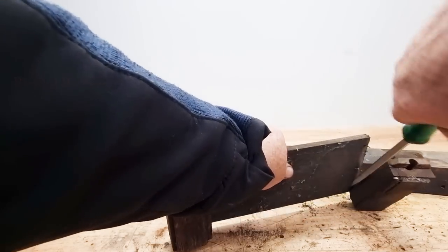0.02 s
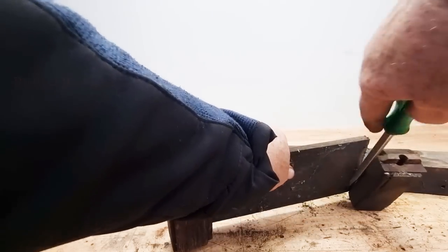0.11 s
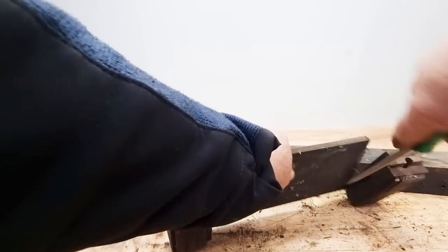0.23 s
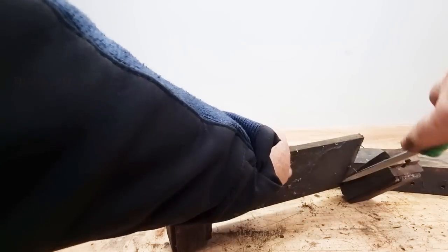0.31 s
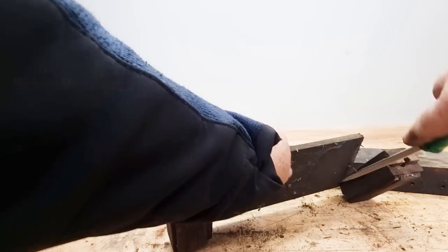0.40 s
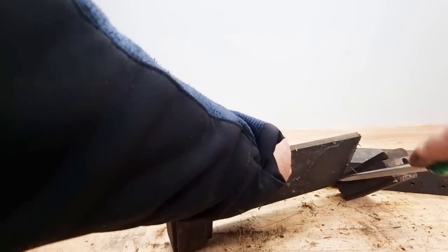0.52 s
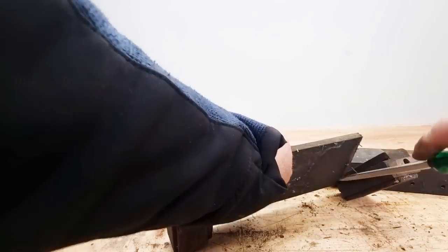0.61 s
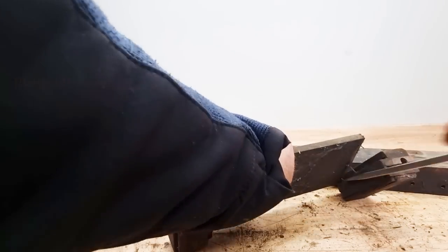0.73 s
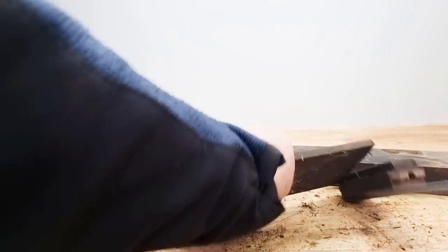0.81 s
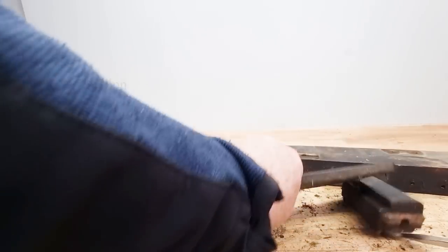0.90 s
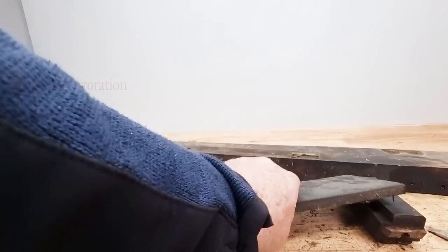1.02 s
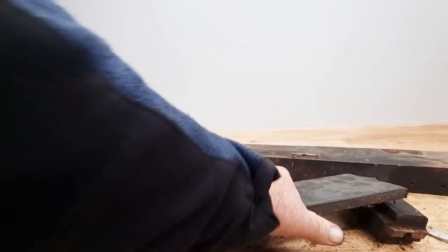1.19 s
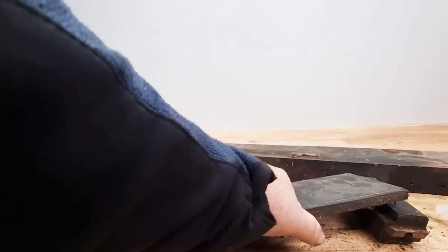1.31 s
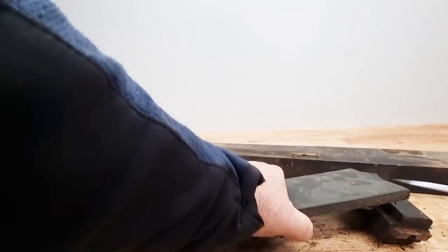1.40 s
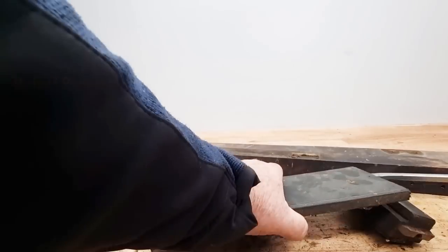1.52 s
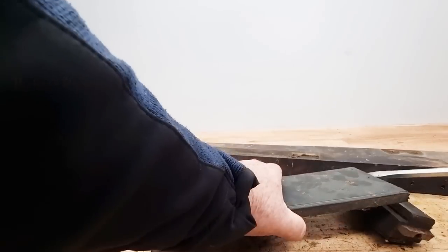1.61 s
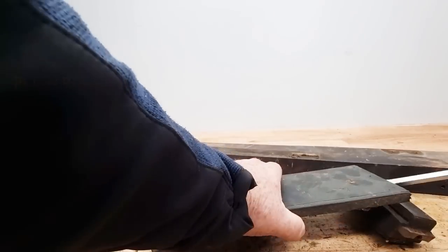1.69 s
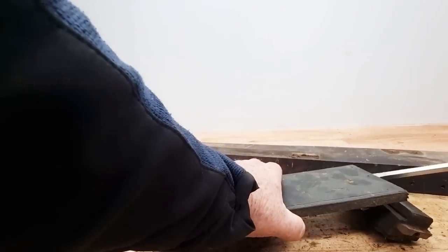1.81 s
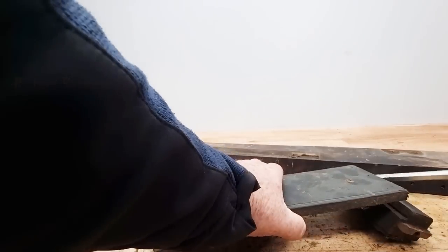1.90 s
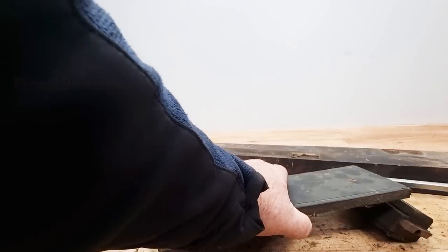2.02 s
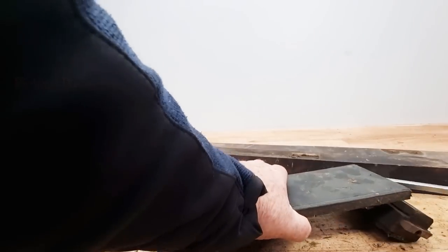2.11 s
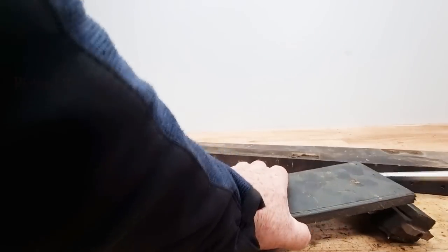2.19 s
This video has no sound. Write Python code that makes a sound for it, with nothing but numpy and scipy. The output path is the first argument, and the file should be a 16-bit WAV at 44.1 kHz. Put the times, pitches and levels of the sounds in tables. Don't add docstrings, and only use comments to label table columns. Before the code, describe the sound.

Close stereo pickup of old timber being prised on a wooden bench: faint drag, dry crack, dull thumps, a thin metal ping, a busy burst of wooden knocks, then light ticks over faint room hum.

```python
import sys
import numpy as np
from scipy import signal
from scipy.fft import rfft, irfft, next_fast_len
from scipy.io import wavfile
from scipy.ndimage import uniform_filter1d, map_coordinates

SR = 44100
rng = np.random.default_rng(int(sys.argv[2]) if len(sys.argv) > 2 else 0)


def gain_from_db(level_db):
    decades = np.asarray(level_db, float) / 20
    return 10 ** decades


def store_wav(level_fs):
    pcm = np.round(np.clip(np.atleast_2d(level_fs), -1, 1) * 32767)
    wavfile.write(sys.argv[1], SR, pcm.T.astype(np.int16))


N = 97020

# pitch_hz, level_db (per Hz)
ROOM_TONE = [(15, -45), (25, -22), (81, -6), (215, -9), (500, -13), (1330, -14), (2700, -25), (3600, -40),
             (6000, -61)]
ROOM_TONE_DB = -60
# pitch_hz, width_hz, level_db
HUMS = [(155.8, 5.5, -72.5), (482, 70, -67.5)]
# pitch_hz, level_db (per Hz)
HISS_COLOUR = [(4000, 2.5), (11000, -6.5)]
HISS_DB, HISS_TOP_HZ = -84.5, 11950
MOTOR_HZ, MOTOR_WANDER_HZ = 95, 3.96
MOTOR_DB, MOTOR_SWELL_DB, MOTOR_FADE_DB = -60, 3.2, -8.5

# pitch_hz, t60_s (time to die by 60 dB)
ROOM_DECAY = [(150, 0.41), (1000, 0.26), (4000, 0.28), (14000, 0.26)]
ROOM_DB, ROOM_GAP_S = -1, .007
# pitch_hz, likeness_0_to_1
LIKENESS = [(100, .99), (300, .93), (600, .85), (1400, .7), (3100, .6), (6800, .3), (15000, .2)]

# start_s, length_s, level_db
DRAG_STROKES = [
    (0.0, 0.13, -65.5),
    (0.223, 0.071, -51.5),
    (0.51, .11, -58),
    (0.13, .09, -66),
    (0.7, 0.17, -60),
    (0.9, .17, -56),
    (1.2, 0.11, -60),
    (1.446, .045, -57.5),
    (1.751, 0.094, -75),
]
# pitch_hz, level_db (per Hz)
DRAG_COLOUR = [(200, -17), (450, 5.5), (1000, 1), (2400, -6.5), (3500, -14.5), (8000, -42.5)]
GRAINS_PER_S, GRAIN_SPREAD_DB = 2000, 3

# start_s, peak_db, pitch_hz, swell_s, ring_share (if a hand damps it)
PUSHES = [(0.698, -44, 390, 0.003, .4), (0.241, -39, 250, 0.0032), (0.259, -42, 330, 0.0017),
          (0.276, -39, 197, 0.0061), (0.29, -46, 420, 0.011, .7), (0.472, -42, 249, 0.003),
          (0.514, -35.5, 233, 0.0065), (0.540, -34, 227, 0.0017, .7), (0.562, -45, 330, 0.002, .5),
          (0.661, -42, 210, 0.0034), (0.69, -32.5, 232, 0.0077), (0.779, -46, 330, 0.004, .6),
          (0.826, -36, 233, 0.0052), (0.841, -32.5, 245, 0.0079), (0.864, -35, 249, 0.008),
          (0.904, -39.5, 382, 0.0024), (0.913, -31, 240, 0.0067), (0.947, -29, 255, 0.012),
          (0.969, -37.5, 384, 0.0026), (0.982, -30, 211, 0.0069), (1.001, -46, 413, 0.0022),
          (1.131, -37, 281.5, 0.0016), (1.143, -45, 306, 0.0012), (1.152, -45, 420, 0.004),
          (1.206, -38.5, 260, 0.0065), (1.356, -56, 285, 0.0027), (1.663, -50, 256, 0.0038),
          (1.717, -50, 237, 0.0046), (1.761, -48, 203, 0.0044), (2.079, -43.5, 233, 0.014),
          (0.485, -41, 250, .003, .7), (0.519, -48, 450, .002, .3), (0.549, -44, 380, .002, .5),
          (0.803, -44, 400, .003, .5), (0.813, -46, 300, .003, .5), (0.17, -54, 200, .01),
          (0.745, -50, 200, .005), (1.449, -57, 500, .003, .4), (1.5, -56, 190, .01)]
# pitch_hz, level_db, t60_s
BENCH_MODES = [(191.5, 0, 0.085), (243, 4.5, 0.057), (357, 2.5, 0.09), (420, 0.5, 0.15), (507, -6, 0.1)]
# start_s, peak_db, pitch_hz
BLOCK_HITS = [(0.698, -38, 950), (0.5375, -38, 800), (0.8995, -25, 1350), (0.911, -33, 1450),
              (0.9405, -24, 1400), (0.967, -32, 1330), (0.972, -30, 850), (0.990, -31, 1400),
              (1.016, -38, 1220), (1.1275, -31, 1040), (1.1285, -38, 520), (1.1955, -28, 1330),
              (1.2115, -32, 1350), (1.449, -49, 1500), (1.462, -49, 1400), (0.905, -36, 1300),
              (0.914, -36, 1500), (0.927, -38, 1300), (0.947, -40, 1500), (0.954, -38, 1350),
              (0.978, -35, 1200), (1.003, -40, 1000), (1.137, -45, 950), (1.145, -45, 1100),
              (1.202, -42, 1500), (1.207, -43, 1100), (1.220, -41, 950), (1.240, -48, 1250),
              (0.699, -43, 1600), (0.518, -54, 600), (0.542, -46, 1400)]
# pitch_hz, level_db, t60_s
BLOCK_MODES = [(580, 8, 0.025), (820, -1, 0.02), (1060, 4, 0.017), (1230, 5, 0.018), (1400, 1, 0.016),
               (1560, -1, 0.016), (1750, 7, 0.017), (2330, -8, 0.025)]
BASS_CUT_HZ = 70

# start_s, length_s, level_db, low_edge_hz, top_edge_hz (if duller)
SCRAPE_STROKES = [
    (0.47, 0.064, -68, 1800),
    (0.71, 0.11, -82, 1000),
    (0.823, 0.043, -64, 3300, 10000),
    (0.9, 0.098, -75.5, 1970),
    (1.031, 0.18, -82.5, 2000),
    (1.234, 0.076, -85.5, 2000),
    (1.318, 0.058, -78.5, 2500),
    (1.448, 0.03, -67, 1700, 4000),
    (1.652, 0.025, -78, 2200, 4000),
]
# pitch_hz, width_hz, level_db (over the plain rasp)
TIP_MODES = [(2500, 350, 10), (3850, 400, 11), (4450, 300, 6), (6400, 400, 7), (7200, 500, 11)]
STROKE_EDGE_S, TIP_TOP_HZ = 0.0066, 12000

# start_s, peak_db, pitch_hz
SHAFT_TICKS = [
    (0.698, -34, 2400),
    (0.703, -35, 2100),
    (0.707, -42, 2100),
    (1.738, -43, 2300),
    (1.7405, -41, 2400),
    (1.741, -49, 4200),
    (1.760, -51, 2200),
]
# pitch_hz, level_db, t60_s
SHAFT_MODES = [(2080, -3, .025), (2330, 0, .035), (2700, -2, .02), (3400, -8, .02), (3800, -4, .025),
               (4350, -3, .025), (4800, -7, .02), (6700, -6, .025)]
# start_s, peak_db, pitch_hz
PINGS = [
    (0.5385, -43.5, 2840),
    (0.556, -58, 2300),
]
# pitch_hz, level_db, t60_s
FREE_SHAFT_MODES = [(2590, 0, .04), (3750, -4, .03), (5300, -1, .028)]
# start_s, peak_db, pitch_hz
LIGHT_TOUCH = [
    (1.704, -60, 4330),
]

# start_s,
# level_db, t60_s, low_edge_hz, top_edge_hz
CRACK_BURSTS = [(0.0604, -47.5, 0.07, 7000, 13000), (0.2315, -41, 0.19, 1110, 22000),
                (0.234, -46, .05, 1500, 9000), (0.698, -47, 0.03, 1180, 4800),
                (0.692, -62, .03, 2000, 4500), (0.901, -44, 0.079, 1720, 4200),
                (0.939, -47, 0.09, 1740, 3700), (0.9724, -59.5, 0.051, 2000, 14000),
                (0.99, -50, 0.039, 1770, 3200), (1.126, -55, 0.046, 1530, 4860),
                (1.21, -62, 0.12, 2000, 4240), (1.265, -63, 0.06, 2400, 7800),
                (1.738, -57, 0.029, 2500, 12000)]
CRACK_TILT_DB, CRACK_RISE_S = -5, 0.00085

# pitch_hz, lift_db
RIGHT_TREBLE = [(300, .3), (1500, .3), (2800, 3.7), (5000, 7.5), (12000, 7)]
# pitch_hz, phase_radians
LEFT_PHASE = [(150, .05), (500, .1), (1200, .25), (2000, .2), (4300, .8), (9000, .9), (14000, 1.7)]
TOP_HZ = 16450


def unit(x):
    return x / np.sqrt(np.mean(x ** 2) + 1e-20)


def along(points, hz):
    f, value = np.transpose(points)
    return np.interp(np.log(hz + 1), np.log(f + 1), value)


def filtered(x, response):
    n = x.shape[-1]
    size = next_fast_len(n + 8192)
    spectrum = rfft(x, size) * response(np.fft.rfftfreq(size, 1 / SR))
    return irfft(spectrum, size)[..., :n]


def high(low_hz):
    return lambda hz: (1j * hz / (low_hz + 1j * hz)) ** 2


def add(track, s, sound):
    part = track[..., round(s * SR):][..., :sound.shape[-1]]
    part += sound[..., :part.shape[-1]]


def pair(count):
    def mid_and_side(hz):
        turn = np.arccos(np.clip(along(LIKENESS, hz), -1, 1)) / 2
        return np.array([np.cos(turn), np.sin(turn)])

    mid, side = filtered(rng.standard_normal((2, count)), mid_and_side)
    return np.array([mid + side, mid - side])


def room(x, wet_db=0):
    x = x * np.ones((2, 1))
    hz, t, z = signal.stft(pair(SR // 3), SR, nperseg=256)
    fade = gain_from_db(-60 * t / along(ROOM_DECAY, hz)[:, None])
    tail = signal.istft(z * fade, SR, nperseg=256)[1]
    late = np.pad(x, ((0, 0), (round(ROOM_GAP_S * SR), 0)))
    wet = signal.fftconvolve(late, tail / np.linalg.norm(tail[0]), axes=1)
    direct = np.pad(x, ((0, 0), (0, wet.shape[1] - x.shape[1])))
    return gain_from_db(ROOM_DB + wet_db) * wet + direct


def struck(events, modes, reach_oct, gain_db, wet_db, swell_s=.001, scatter=0.026):
    out, t = np.zeros((2, N)), np.arange(SR // 5) / SR
    hz, level_db, t60 = np.transpose(modes)[..., None]
    for s, db, pitch_hz, *soft in events:
        rise_s = soft[0] if soft else swell_s
        ring_share = soft[1] if soft[1:] else 1
        luck = rng.standard_normal((len(modes), 3))
        nearness = np.exp(-(np.log2(hz / pitch_hz) / reach_oct) ** 2 / 2)
        share = gain_from_db(level_db + luck[:, :1]) * nearness
        mode_hz = hz * (1 + scatter * luck[:, 1:2])
        waves = np.sin(2 * np.pi * mode_hz * t + .2 * luck[:, 2:])
        ring = np.sum(share * gain_from_db(-60 * t / (t60 * ring_share)) * waves, axis=0)
        ring = ring * (1 - np.exp(-(t / rise_s) ** 2))
        add(out, s, room(gain_from_db(db + gain_db) * ring / np.linalg.norm(share), wet_db))
    return out


def grit(count):
    luck = rng.random((2, count))
    size = gain_from_db(-GRAIN_SPREAD_DB * np.log(luck[1] + 1e-4))
    breaks = (luck[0] < GRAINS_PER_S / SR) * size
    return unit((uniform_filter1d(breaks, size=6) + 0.3) * pair(count))


def air():
    drift_db = map_coordinates(rng.standard_normal(20), [np.linspace(1, 18, N)])
    tone = filtered(pair(N), lambda hz: gain_from_db(along(ROOM_TONE, hz)))
    return gain_from_db(ROOM_TONE_DB + drift_db) * unit(tone)


def hiss():
    def colour(hz):
        return gain_from_db(along(HISS_COLOUR, hz)) * (hz < HISS_TOP_HZ) * high(2000)(hz)

    return gain_from_db(HISS_DB) * unit(filtered(pair(N), colour))


def hums():
    out = np.zeros((2, N))
    for hz, width, db in HUMS:
        band = filtered(pair(N), lambda f: 1 / (1 + ((f - hz) / width * 2) ** 2))
        out += gain_from_db(db) * unit(band)
    return out


def motor():
    wander = rng.standard_normal((2, 40))
    pitch, swell = (map_coordinates(row, [np.linspace(1, 38, N)]) for row in wander)
    turn = 2 * np.pi * np.cumsum(MOTOR_HZ + MOTOR_WANDER_HZ * pitch) / SR
    fade_db = MOTOR_FADE_DB * np.linspace(0, 1, N)
    return gain_from_db(MOTOR_DB + MOTOR_SWELL_DB * swell + fade_db) * np.sin(turn)


def drags():
    out = np.zeros((2, N))
    for s, length, db in DRAG_STROKES:
        t = np.arange(round((length + .12) * SR)) / SR
        shape = (1 - np.exp(-t / 0.0033)) * np.exp(-np.maximum(t - length, 0) / 0.01)
        rub = unit(filtered(grit(len(t)), lambda hz: gain_from_db(along(DRAG_COLOUR, hz))))
        add(out, s, room(gain_from_db(db) * shape * rub))
    return out


def bench():
    thumps = struck(PUSHES, BENCH_MODES, .3, 11.5, wet_db=-8)
    return filtered(thumps, high(BASS_CUT_HZ))


def blocks():
    knocks = struck(BLOCK_HITS, BLOCK_MODES, .25, 7.5, wet_db=-8, swell_s=.001)
    return filtered(knocks, high(BASS_CUT_HZ))


def scrapes():
    out = np.zeros((2, N))
    for s, length, db, low_hz, *dull in SCRAPE_STROKES:
        t = np.arange(round((length + 6 * STROKE_EDGE_S) * SR)) / SR
        shape = (1 - np.exp(-t / 0.001)) * np.exp(-np.maximum(t - length, 0) / STROKE_EDGE_S)
        top_hz = dull[0] if dull else TIP_TOP_HZ

        def colour(f):
            ringing = 1
            for centre, width, gain_db in TIP_MODES:
                pull = 1j * f * width
                ringing = ringing + gain_from_db(gain_db) * pull / (centre * centre - f * f + pull)
            return high(low_hz)(f) * ringing / (1 + 1j * f / top_hz) ** (1 + len(dull))

        add(out, s, room(gain_from_db(db) * shape * unit(filtered(grit(len(t)), colour))))
    return out


def shaft():
    ticks = struck(SHAFT_TICKS, SHAFT_MODES, .24, -1.5, wet_db=-9, swell_s=.0016)
    pings = struck(PINGS, FREE_SHAFT_MODES, 0.67, 0, wet_db=-14, swell_s=0.002, scatter=0)
    graze = struck(LIGHT_TOUCH, SHAFT_MODES, .03, 0, wet_db=-9, swell_s=.003, scatter=0)
    return ticks + pings + graze


def cracks():
    out, t = np.zeros((2, N)), np.arange(SR // 4) / SR
    for s, db, t60, low_hz, top_hz in CRACK_BURSTS:
        def colour(hz):
            tilt = gain_from_db(CRACK_TILT_DB * np.log2(hz / 4000 + 0.033))
            return high(low_hz)(hz) * high(low_hz / 2)(hz) * tilt / (1 + (hz / top_hz) ** 4)

        burst = unit(filtered(pair(len(t)) + .5 * grit(len(t)), colour))
        shape = gain_from_db(db - 60 * t / t60) * (1 - np.exp(-t / CRACK_RISE_S))
        add(out, s, room(shape * burst))
    return out


def scene():
    background = air() + hiss() + hums() + motor()
    wood = drags() + bench() + blocks()
    tool = scrapes() + shaft()
    return background + wood + tool + cracks()


def band_limit(x):
    return signal.sosfilt(signal.butter(12, 16490, fs=SR, output="sos"), x)


def record(dry):
    half = np.array([[-.5], [.5]])

    def port(hz):
        lift = gain_from_db(along(RIGHT_TREBLE, hz) * half)
        lead = np.exp(-1j * half * along(LEFT_PHASE, hz))
        return lift * lead * (hz < TOP_HZ)

    return band_limit(filtered(dry, port))


dry = scene()
out = record(dry)
store_wav(out)
```